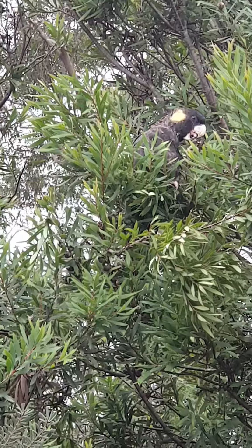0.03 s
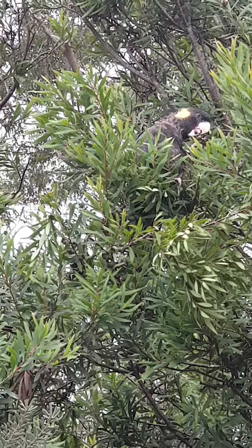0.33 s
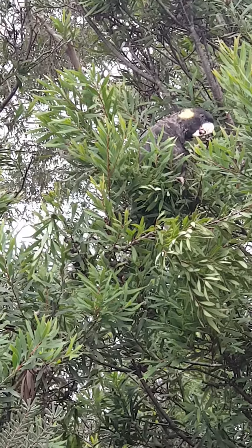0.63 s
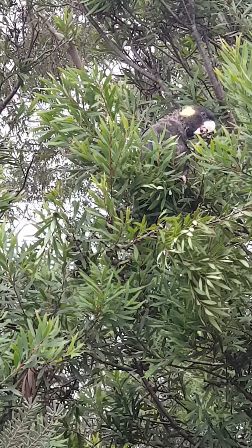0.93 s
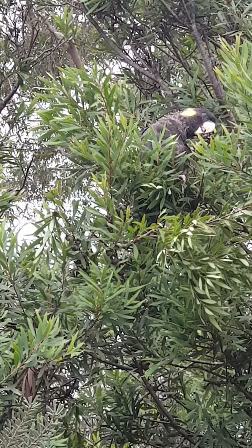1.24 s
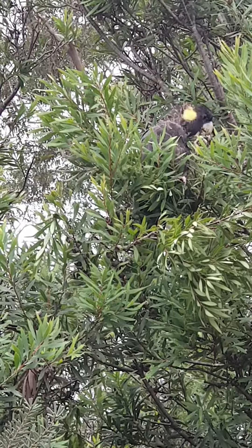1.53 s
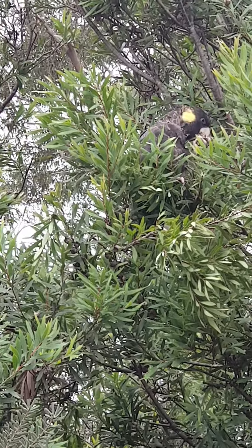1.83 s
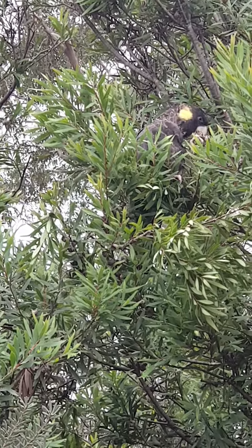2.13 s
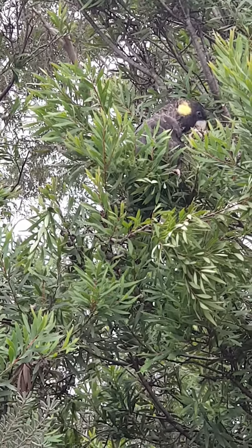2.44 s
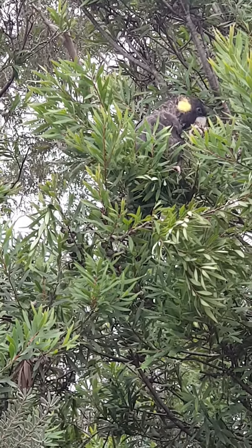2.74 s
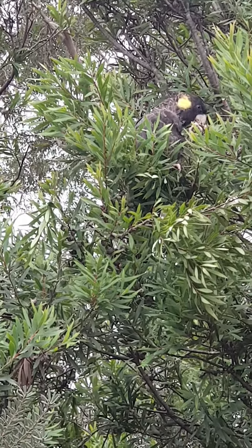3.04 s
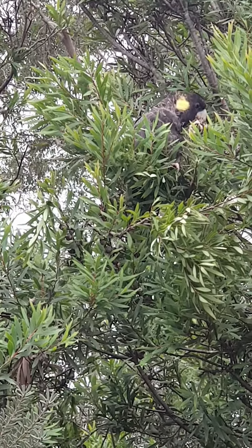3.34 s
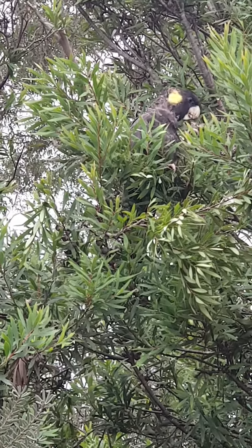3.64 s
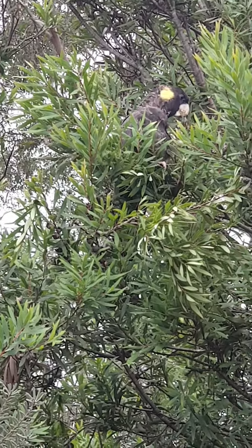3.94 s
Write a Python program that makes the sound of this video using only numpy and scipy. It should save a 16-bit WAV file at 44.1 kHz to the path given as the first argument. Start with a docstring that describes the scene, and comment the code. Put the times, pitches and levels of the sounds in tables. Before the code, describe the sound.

A cockatoo cracks woody seed pods in a tree, making sharp, irregular clicks and snaps, mostly on the right. Distant traffic rumbles as two cars swell past. The cracking stops and a far swish rises at the end.

```python
"""Distant traffic rumbles behind a leafy tree, and two cars swell past. In the tree a cockatoo cracks
woody seed pods: each crack rings the pod for a millisecond or two, throws a bright splinter snap and
scatters through the foliage. The bird brushes a few leaves, and a far swish grows at the end.
The left microphone is shaded and hears little treble."""
import sys
import numpy as np
from scipy import signal
from scipy.fft import rfft, irfft
from scipy.io import wavfile
from scipy.ndimage import uniform_filter1d

SR = 44100
rng = np.random.default_rng(int(sys.argv[2]) if len(sys.argv) > 2 else 0)


def wav_out(sig):
    """Save sig, one row per channel (or a flat mono array), as 16-bit PCM at SR to the path in sys.argv[1]."""
    wavfile.write(sys.argv[1], SR, np.round(np.clip(np.atleast_2d(sig).T, -1, 1) * 32767).astype(np.int16))


N = 176400


def undb(db):
    """Decibels to gain."""
    return 10 ** (np.asarray(db) / 20)


def unit(x):
    """Scale to rms 1."""
    return x / np.sqrt(np.mean(x ** 2))


def curve(table, column=1, size=N):
    """A column of a table, joined over log frequency."""
    rows = np.array(table, float)
    return np.interp(np.log(np.fft.rfftfreq(size, 1 / SR) + 1), np.log(rows[:, 0]), rows[:, column])


def noise(colour):
    """Noise of a given spectrum, rms 1."""
    return unit(irfft(rfft(rng.standard_normal(N)) * undb(curve(colour)), N))


def waver(rate_hz):
    """Smooth random drift, rms 1."""
    hold = int(SR / rate_hz)
    steps = rng.standard_normal(N)[np.arange(N) // hold]
    return unit(uniform_filter1d(uniform_filter1d(steps, hold), hold))


def add(track, start_s, sound):
    """Lay a short sound into a track."""
    i = int(start_s * SR)
    track[i:i + len(sound)] += sound[:N - i]


# The far road at the two microphones. Each row: frequency in Hz, left minus right in dB, likeness 0-1.
MIC_PAIR = [(60, 2.73, .99), (198, -0.04, .99), (482, 2.5, 0.9), (915, -1, 0.93), (1190, -7.5, 0.82),
            (1500, -8, 0.73), (2320, -16, 0.47), (3200, -6, 0.14), (4000, -17, 0.3), (5000, -28, 0),
            (8000, -40, 0.3)]
# Traffic reaches the left microphone first. Each row: frequency in Hz, lead in seconds.
LEFT_LEAD = [(1050, 0), (1400, .0001), (2000, .00014), (2500, .0002)]


def distant(colour):
    """Far noise at both microphones: alike in the bass, shaded on the left in the treble."""
    right, unrelated = noise(colour), noise(colour)
    likeness = np.clip(curve(MIC_PAIR, column=2), 0, 1)
    left = likeness * rfft(right) + np.sqrt(1 - likeness ** 2) * rfft(unrelated)
    advance = np.exp(2j * np.pi * np.fft.rfftfreq(N, 1 / SR) * curve(LEFT_LEAD))
    return np.array([irfft(left * undb(curve(MIC_PAIR)) * advance, N), right])


# Engines, steady road and passing tyres, heard from the tree.
# Each row: frequency in Hz, relative spectral level in dB.
ENGINE_COLOUR = [(20, -39), (33, -34), (44, -9.5), (60, 1.5), (76, -3.5), (98, 1), (130, -6), (200, -8),
                 (280, -14.5), (400, -25.5), (700, -26.5), (2000, -82)]
ROAD_COLOUR = [(200, -15.5), (450, -10.5), (800, -1.5), (1100, 1.5), (1500, -1.5), (2100, -0.5), (2550, -9),
               (3000, -19.5), (3600, -24), (4600, -19.5), (5400, -31), (7600, -28.5), (8700, -58),
               (16000, -72)]
TYRE_COLOUR = [(200, -7), (400, -18), (680, -5.5), (980, -2), (1250, -4.5), (1600, -7.5), (2200, -16),
               (3100, -37), (4600, -35.5), (5500, -39.5), (7500, -36.5), (8800, -71)]
# Two cars and two fainter swells. Each row: peak time in seconds, half length in seconds, level in dB.
CAR_PASSES = [(0.83, 0.32, -35), (2.36, 0.45, -36.5), (1.88, 0.067, -45.5), (2.88, .25, -46)]


def traffic(t, road_db=-39.5, engine_db=-39):
    """Engine rumble and steady road noise; tyre roar swells as each car comes near."""
    car_power = sum(undb(db) ** 2 / (1 + ((t - peak) / half) ** 2) ** 2 for peak, half, db in CAR_PASSES)
    roar = np.sqrt(car_power) * distant(TYRE_COLOUR) + undb(road_db) * distant(ROAD_COLOUR)
    flutter = undb(.4 * waver(14))
    rumble = undb(engine_db + waver(8)) * distant(ENGINE_COLOUR)
    return roar * flutter + rumble


# Hiss on both channels. Each row: frequency in Hz, relative spectral level in dB.
HISS_COLOUR = [(3000, 8), (8000, -7), (9200, -8.5), (11000, 3), (13000, 4), (15500, 0.5)]


def hiss(level_db=-75):
    """A faint steady hiss, independent left and right."""
    return undb(level_db) * np.array([noise(HISS_COLOUR), noise(HISS_COLOUR)])


def decay(t, t60_s, rise_s):
    """A quick rise under an exponential fall."""
    return undb(-60 * t / t60_s) * (1 - np.exp(-t / rise_s))


def unit_attack(x):
    """Scale a short sound to rms 1 over its first 2 ms."""
    return x / np.sqrt(np.mean(x[:int(.002 * SR)] ** 2))


# Modes of the pod in the beak. Each row: frequency in Hz, relative level in dB, seconds to fall 60 dB.
POD_MODES = [(2600, -8, 0.01), (3200, 3, 0.0019), (4600, 17.5, 0.0023), (5180, -2, 0.0059),
             (5670, 11, 0.0032), (6850, -1.5, 0.01), (7490, 5.5, 0.011)]
RING_OCTAVES = .43  # width of the band a crack excites


def pod_ring(centre_hz, grip_detune=.025, tear_s=.0022, tear_db=-13.5):
    """A fracture rings the pod's modes, most near one pitch and detuned by the beak's grip."""
    t = np.arange(1024) / SR
    ring = 0
    for k, (hz, db, t60) in enumerate(POD_MODES):
        weight = undb(db) * np.exp(-.5 * (np.log2(hz / centre_hz) / RING_OCTAVES) ** 2)
        gripped_hz = hz * (1 + grip_detune * rng.standard_normal())
        ring += (-1) ** k * weight * decay(t, t60, rise_s=.0002) * np.sin(2 * np.pi * gripped_hz * t)
    # a second fibre gives way just after the first
    tear = np.interp(t - tear_s * rng.uniform(.8, 1.0), t, ring, left=0)
    return unit_attack(ring + undb(tear_db) * tear)


def noise_band(centre_hz, octaves, colour=None):
    """Half a second of noise around one pitch, rms 1."""
    size = SR // 2
    hz = np.fft.rfftfreq(size, 1 / SR) + 1
    gain = np.exp(-.5 * (np.log2(hz / centre_hz) / octaves) ** 2)
    if colour is not None:
        gain *= undb(curve(colour, size=size))
    return unit(irfft(rfft(rng.standard_normal(size)) * gain))


def splinter_snap(t, centre_hz, octaves):
    """Splintering wood throws a very short, bright burst."""
    return unit_attack(decay(t, t60_s=.006, rise_s=.0003) * noise_band(centre_hz, octaves))


def foliage(t, leaves_db=-4.5, leaves_t60_s=.11, grove_db=-15.5, grove_t60_s=.42):
    """Envelope of the dense echoes off nearby leaves, with a fainter tail from the trees beyond."""
    power = 0
    for db, t60 in ((leaves_db, leaves_t60_s), (grove_db, grove_t60_s)):
        tail = decay(t, t60, rise_s=.0034)
        power += (undb(db) * tail / np.linalg.norm(tail)) ** 2
    return np.sqrt(power)


# Cracks in the tree, at the right microphone. Each row: start in seconds, ring level in dB, ring centre
# in Hz, ring echo offset in dB, snap level in dB, snap centre in Hz, snap width in octaves,
# snap echo offset in dB.
POD_CRACKS = [ (0.248, -52, 6000, -10, -58, 8000, .45, -9), (0.3675, -43.5, 4200, 0, -72, 10000, 0.18, 4),
              (.6005, -58, 6500, -1, -48, 12600, 0.073, 2), (0.7757, -24, 5430, -1, -36.5, 12050, 0.24, 8),
              (1.0587, -31.5, 4300, -5, -61, 12000, .2, 9), (1.0815, -43, 5400, 1, -52.5, 12100, 0.23, 8),
              (1.3043, -28.5, 5450, 1, -36, 11000, 0.17, 0.5), (1.6418, -37.5, 6350, -4, -60, 11800, .2, 9),
              (1.7157, -56, 6500, -1, -49.5, 11600, .16, 4.5),
              (1.8517, -29.5, 6440, 1.5, -41.5, 11800, 0.22, 8), (2.1, -51, 7000, -11, -50, 7040, .05, -6),
              (2.4620, -67, 6000, 3, -69, 11600, .13, 15),
              (2.6326, -24, 5300, -4, -49.5, 10900, 0.26, 12.5),
              (2.8530, -45.5, 4800, 3, -71, 11300, .12, 4), (2.9468, -50, 5500, -3, -80, 11000, .2, 3)]
# The ring as the leaves return it. Each row: frequency in Hz, relative spectral level in dB.
RING_ECHO_COLOUR = [(1800, -28), (3000, 0), (3800, -8), (4500, -1), (5400, -8.5), (7600, -1.5), (8600, -10),
                    (11000, -26), (16000, -43)]
# The left microphone is shaded, less so for the high snap, and hears each crack slightly early.
LEFT_DIRECT_DB, LEFT_FOLIAGE_DB, LEFT_SNAP_LIFT_DB, LEFT_EARLY_S = -34, -19.5, 7, .00027


def cockatoo():
    """Each crack is a pod ring and a splinter snap, heard directly and blurred through the leaves."""
    out, t = np.zeros((2, N)), np.arange(SR // 2) / SR
    echo_envelope = foliage(t)
    microphones = ((LEFT_DIRECT_DB, LEFT_FOLIAGE_DB, LEFT_SNAP_LIFT_DB, LEFT_EARLY_S), (0, 0, 0, 0))
    for start, ring_db, ring_hz, ring_echo_db, snap_db, snap_hz, octaves, snap_echo_db in POD_CRACKS:
        ring = undb(ring_db) * pod_ring(ring_hz)
        snap = undb(snap_db) * splinter_snap(t, snap_hz, octaves)
        for track, (direct_db, foliage_db, lift_db, early_s) in zip(out, microphones):
            add(track, start - early_s, undb(direct_db) * ring)
            add(track, start - early_s, undb(direct_db + lift_db) * snap)
            blurred_ring = noise_band(ring_hz, RING_OCTAVES, RING_ECHO_COLOUR)
            ring_echo = undb(ring_echo_db) * np.linalg.norm(ring) * blurred_ring
            snap_echo = undb(snap_echo_db + lift_db) * np.linalg.norm(snap) * noise_band(snap_hz, octaves)
            add(track, start, undb(foliage_db) * echo_envelope * (ring_echo + snap_echo))
    return out


# Leaves beside the bird. Each row: peak time in seconds, spread in seconds (one standard deviation of a
# Gaussian swell), level in dB.
LEAF_BRUSHES = [(0.328, 0.058, -74), (0.544, .06, -68.5), (.90, .03, -74), (1.682, 0.03, -68),
                (3.41, .04, -77)]
# Their rustle. Each row: frequency in Hz, relative spectral level in dB.
LEAF_COLOUR = [(3000, -20), (7000, 8), (9000, -13), (11000, -1), (13000, 2), (15500, -6)]


def leaf_rustle(t):
    """The bird brushes the leaves, faintly and unevenly."""
    touch = sum(undb(db) * np.exp(-.5 * ((t - peak) / half) ** 2) for peak, half, db in LEAF_BRUSHES)
    touch *= undb(2.8 * waver(90))
    return touch * np.array([undb(LEFT_FOLIAGE_DB) * noise(LEAF_COLOUR), noise(LEAF_COLOUR)])


# A swish far from the tree. One row: peak time in seconds, half length in seconds, level in dB.
SWISH_SWELL = (3.95, 0.17, -39)
# Its colour. Each row: frequency in Hz, relative spectral level in dB.
SWISH_SPECTRUM = [(900, -17), (1600, -2.5), (2100, 9.5), (2450, 1.5), (3000, -22), (6000, -66)]


def far_swish(t):
    """A band of noise near 2 kHz grows out of the traffic at the end."""
    peak, half, db = SWISH_SWELL
    return undb(db) / (1 + ((t - peak) / half) ** 2) * distant(SWISH_SPECTRUM)


def scene():
    """The bird in its tree, over traffic and a faint hiss."""
    t = np.arange(N) / SR
    return cockatoo() + leaf_rustle(t) + traffic(t) + far_swish(t) + hiss()


def record(dry):
    """The recorder opens after a moment and cuts the highest treble."""
    open_s, fade_s, top_hz = .069, .002, 15600
    opened = np.clip((np.arange(N) / SR - open_s) / fade_s, 0, 1)
    return signal.sosfilt(signal.ellip(10, .2, 80, top_hz, fs=SR, output="sos"), dry * opened)


dry = scene()
out = record(dry)
wav_out(out)
```